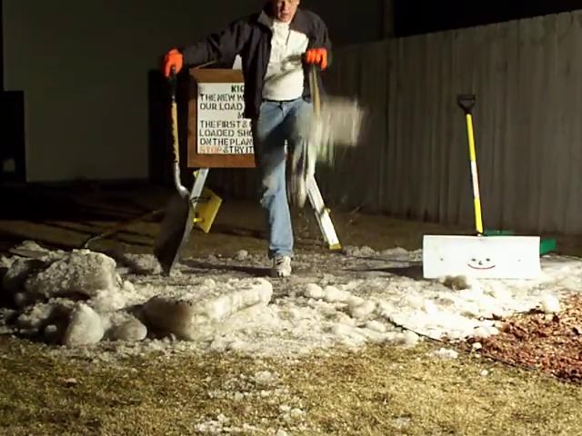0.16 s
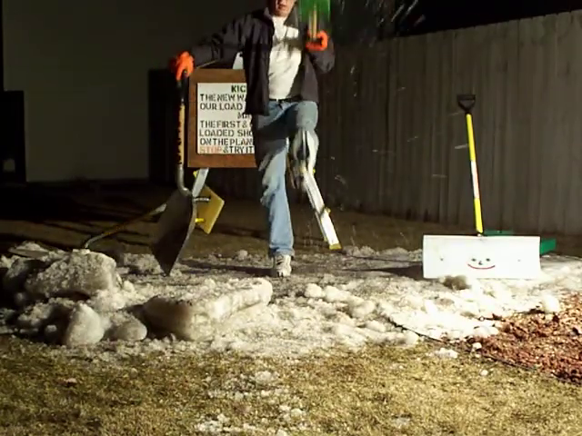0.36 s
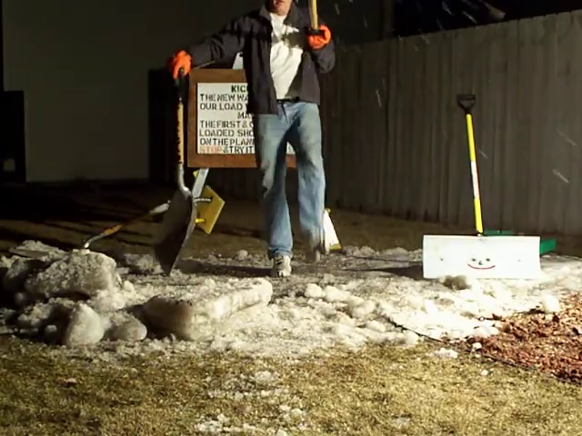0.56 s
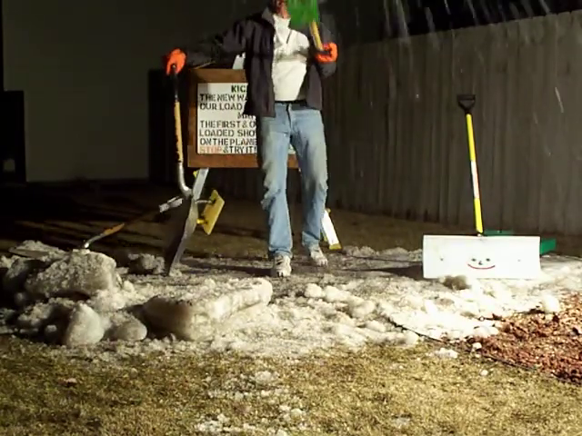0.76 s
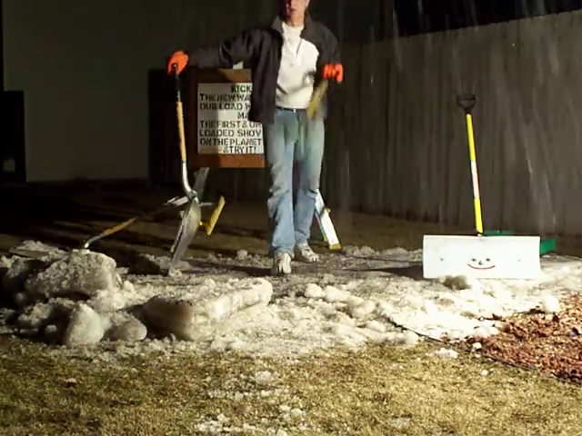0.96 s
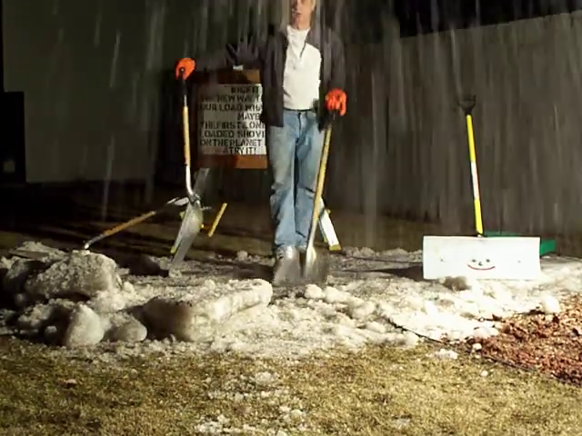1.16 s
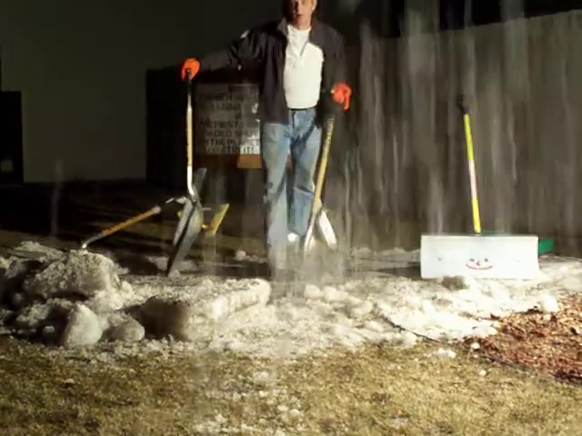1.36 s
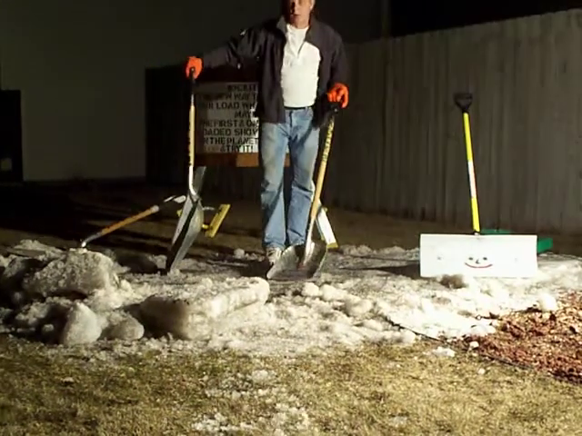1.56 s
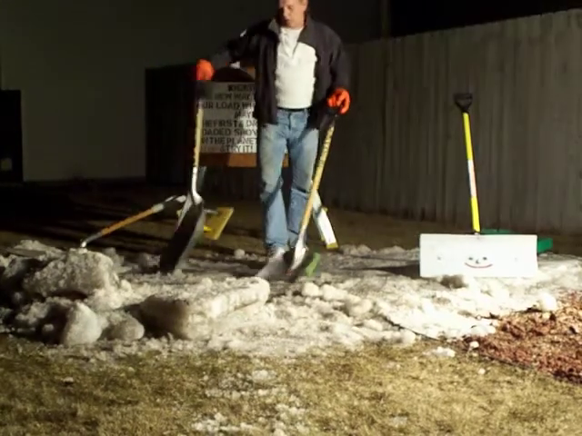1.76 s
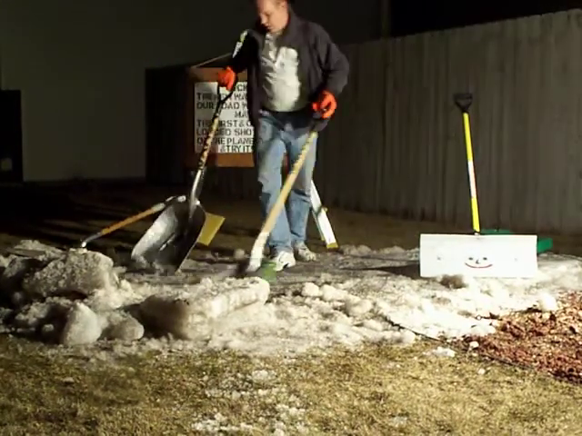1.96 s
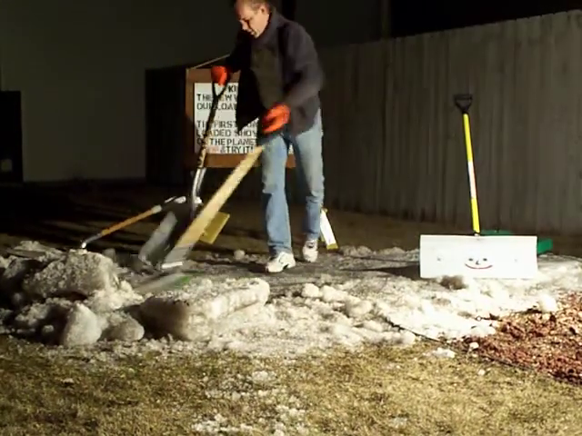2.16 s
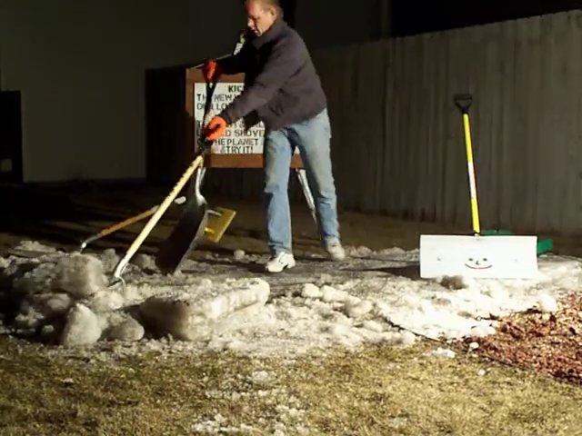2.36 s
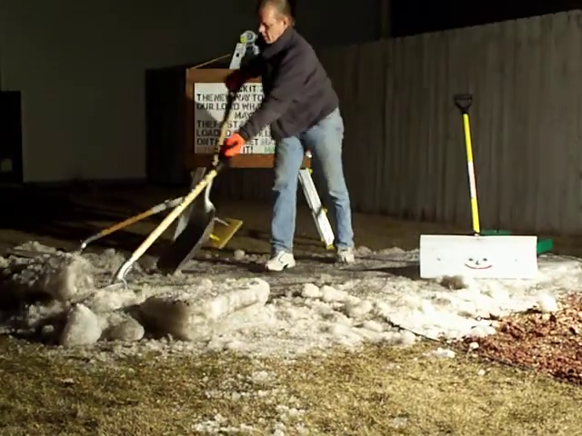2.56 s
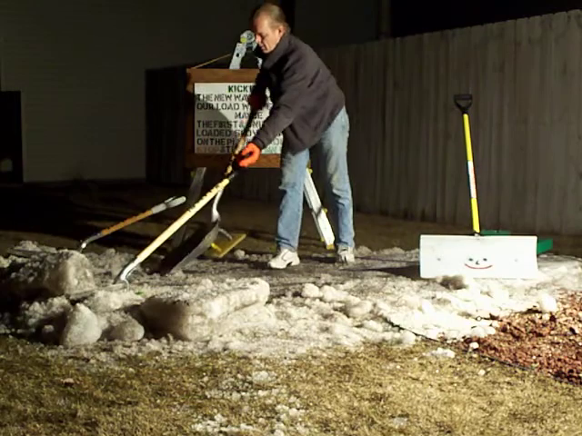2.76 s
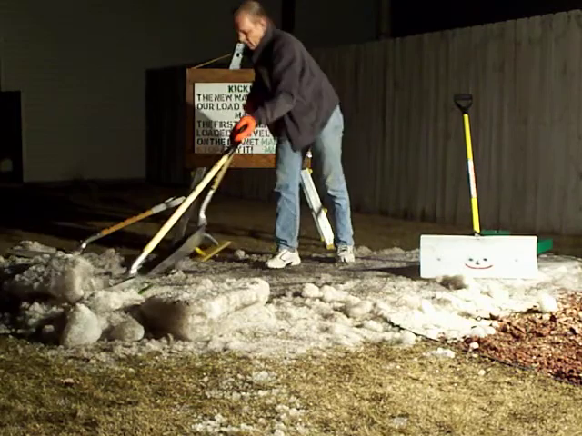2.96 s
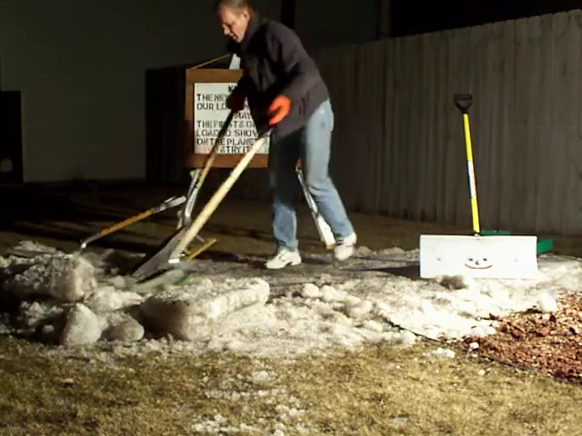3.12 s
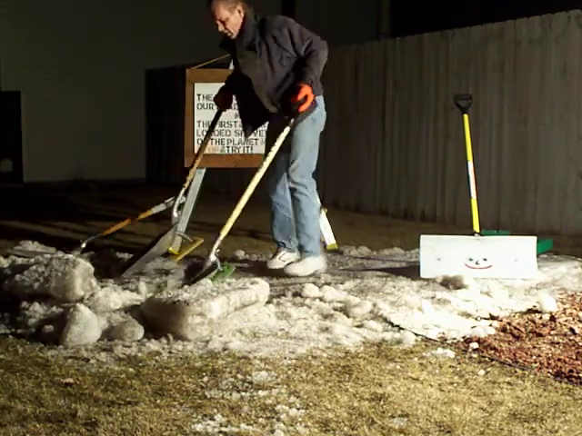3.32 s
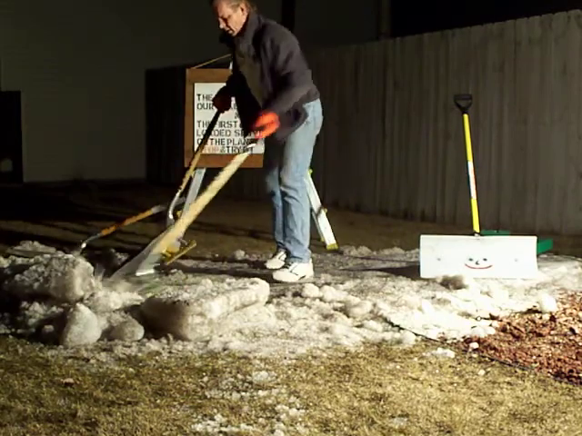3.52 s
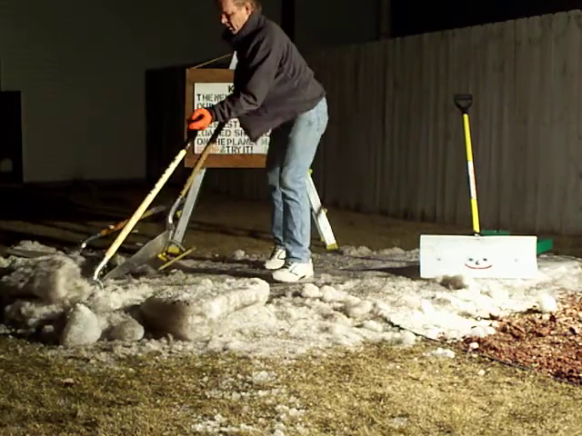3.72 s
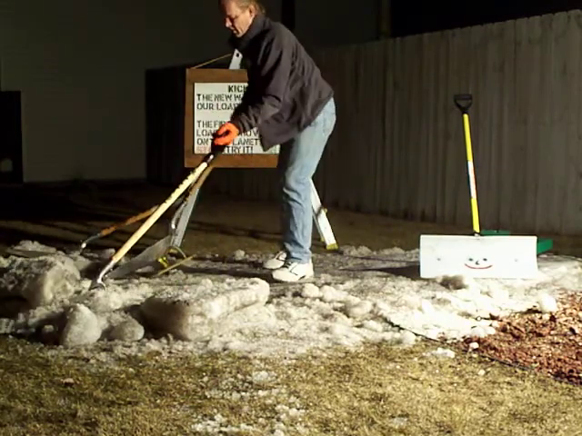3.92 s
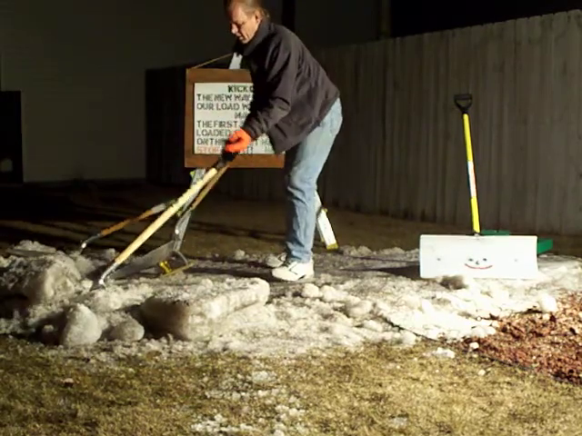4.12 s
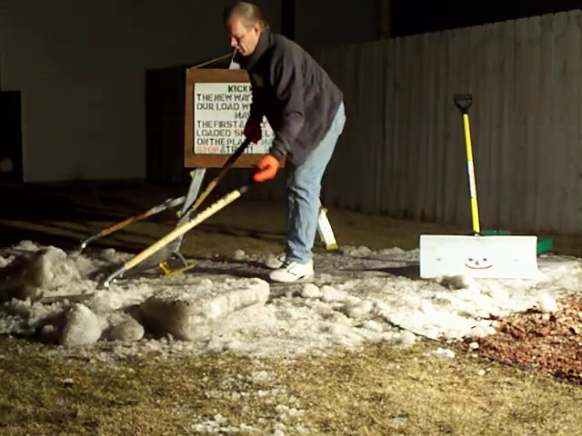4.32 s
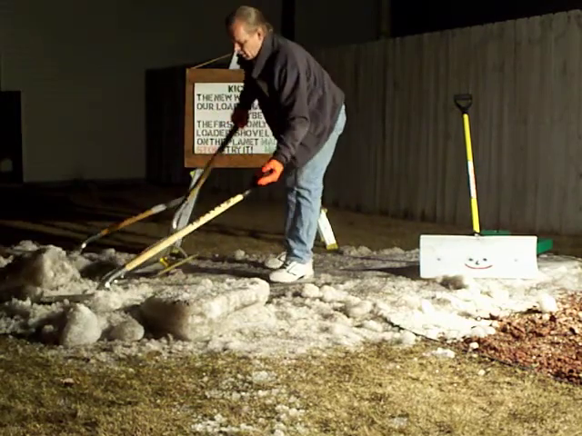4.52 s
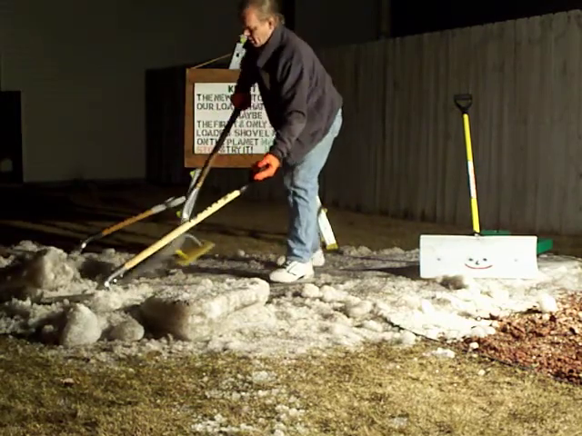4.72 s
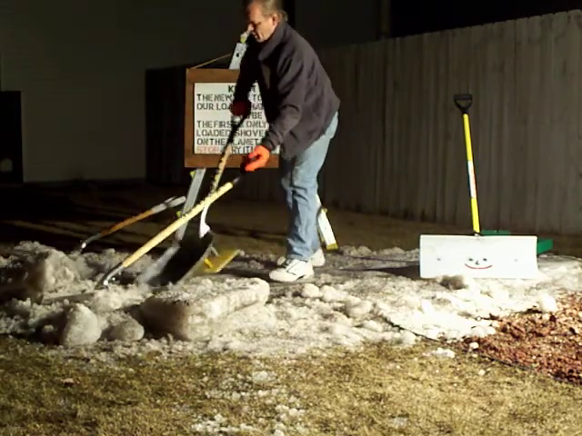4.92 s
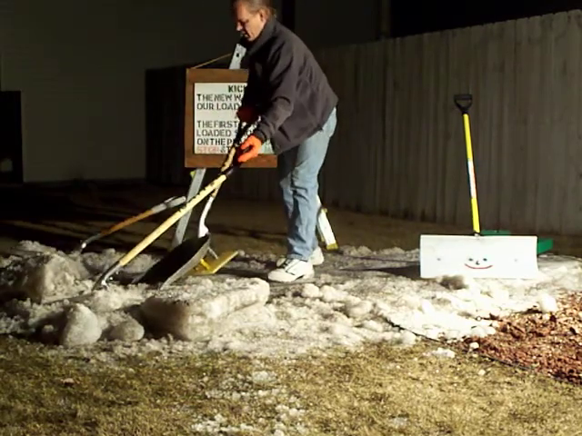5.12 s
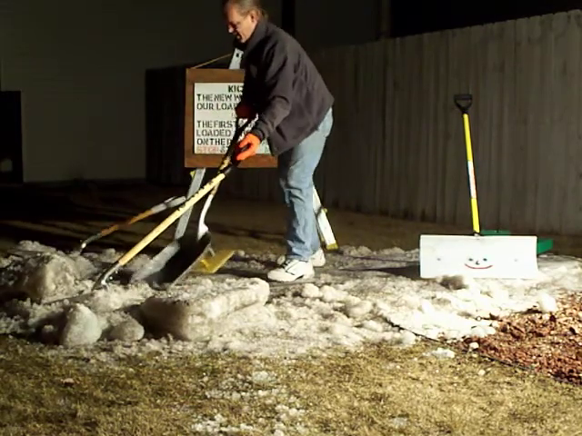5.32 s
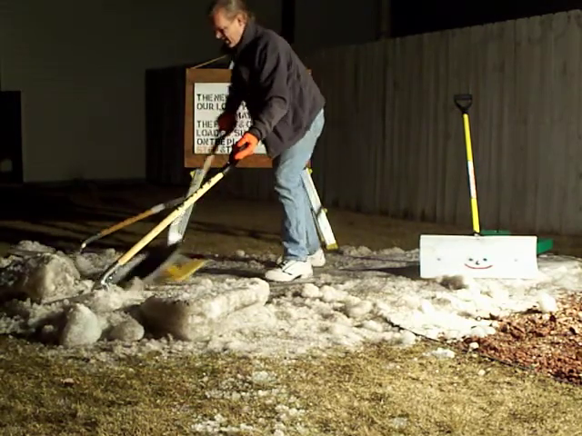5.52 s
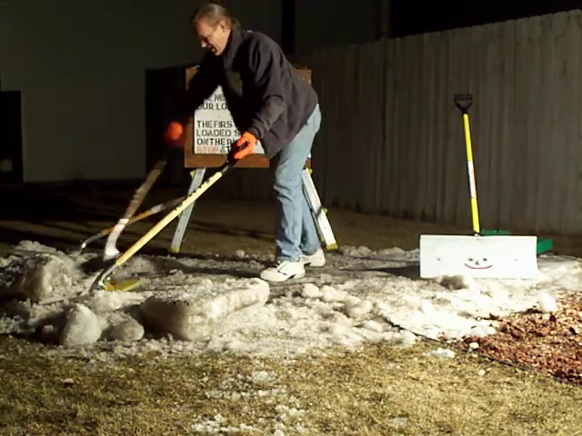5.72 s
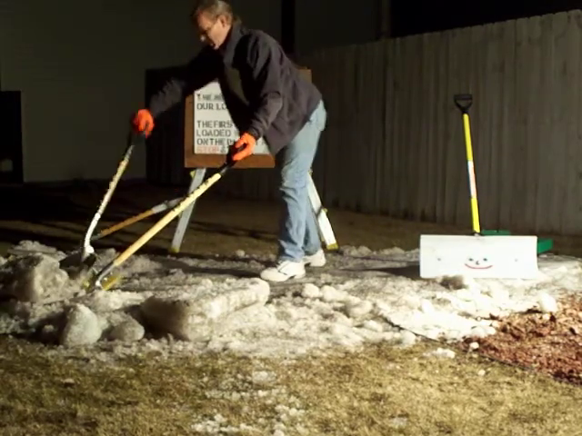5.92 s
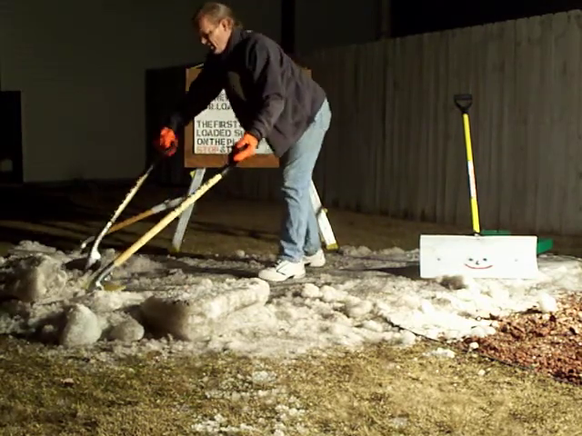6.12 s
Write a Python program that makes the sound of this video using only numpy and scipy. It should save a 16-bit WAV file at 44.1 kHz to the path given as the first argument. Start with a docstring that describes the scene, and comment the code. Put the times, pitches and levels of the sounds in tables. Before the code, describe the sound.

A quiet fenced yard at night, with a soft distant town hum and a faint, wavering, very high whine in thin hiss. At 0.05 to 0.25 s a shovel blade tears out of icy snow in six rapid crackling slips. A near-quiet gap follows until about 0.8 s, when the flung load begins pattering down; a heavy hollow thud lands at 1.13 s and a loud, bright crack at 1.28 s, crumbling away by 1.5 s. From 1.6 s short uneven shoves crunch and hiss through crust, with icy snaps near 2.15 and 2.4 s. Scraping strengthens from 2.8 s to a gritty, clinking bump around 3.45-3.55 s. It is sparse and faint until a crunch at 4.75 s, then harsh icy scraping grows from 5.2 to 5.7 s, with a very sharp click at 5.65 s, ending in weak dull scrapes. Short dry wall reflections, dulled narrow-band microphone.

```python
"""Shovel blades work packed, icy snow in a fenced yard at night, taken with a narrow-band recorder.
One blade judders free in six slips and its load patters and thuds down; then uneven shoves crunch
through the crust. Random grains feed blade modes and body, crunch and hiss filters; cracks and thuds
are decaying fracture bursts, crumbs and clinks decaying sines. Fence and walls add a short tail.
Behind lie a far town hum of filtered noise and a faint, wavering high whine in a thin hiss."""
import sys
import numpy as np
from scipy import signal
from scipy.fft import rfft, irfft
from scipy.io import wavfile
from scipy.ndimage import map_coordinates

SR = 44100
rng = np.random.default_rng(int(sys.argv[2]) if len(sys.argv) > 2 else 0)


def generate_wav(signal):
    """Clip the signal to [-1, 1] and save it as 16-bit WAV at the path in sys.argv[1]."""
    frames = np.transpose(np.atleast_2d(signal))
    scaled = np.clip(frames, -1, 1) * 32767
    pcm = np.round(scaled).astype(np.int16)
    wavfile.write(sys.argv[1], SR, pcm)


N = 272520
TIME = np.arange(N) / SR  # t/s

# Far town hum, relative spectrum: (f/Hz, density/dB per Hz)
TOWN_SPECTRUM = [(20, -24.5), (60, -0.5), (110, 3), (500, 3.5), (1100, 1), (1600, -6), (3300, -21),
                 (8000, -20)]
# Background level, sinking after the loud hit and recovering, before its random wander: (t/s, level/dB)
BACKGROUND_LEVEL = [(0, -54), (1.1, -52.5), (1.55, -58), (2.15, -63), (2.45, -54), (6.18, -52.5)]
# Thin high tones, centre of their waver: (f/Hz, level/dB)
WHINE_TONES = [(7830, -70.5), (8170, -69.5)]
FIZZ_DB, FIZZ_HZ, FIZZ_WIDTH_HZ = -67.5, 7800, 400  # thin hiss around the tones

# Decay of the fence and wall tail: (f/Hz, t60/s)
YARD_DECAY = [(150, 0.04), (600, 0.22), (2000, 0.084), (8000, 0.15)]

# Clods landing and blades bumping: (t/s, peak level/dB, decay/s)
THUDS = [(0.0208, -30.5, 0.0013), (1.1295, -14.5, 0.0057), (1.1339, -19, 0.0016), (1.158, -29, 0.0043),
         (1.286, -29, 0.003), (1.503, -47, 0.0024), (2.878, -39, 0.0026), (3.531, -34, 0.0034),
         (3.541, -24.5, 0.005), (3.864, -34, 0.0013), (4.097, -37.5, 0.0051), (4.283, -42, 0.0043),
         (5.745, -36, 0.0021)]
# Crumbling clod, relative spectrum: (f/Hz, density/dB per Hz)
CLOD_SPECTRUM = [(25, -45.5), (170, -22.5), (320, -9), (450, 3), (750, 1.5), (1100, 2), (2300, -13.5),
                 (8000, -37.5)]
# Hollow ring under a thud: (f/Hz, relative level/dB, decay/s)
KNOCK_MODES = [(337, -9.5, 0.022), (414, 10, 0.0046), (550, 5.5, 0.0036), (857, -6.5, 0.004),
               (1048, 2.5, 0.0078), (1443, -1.5, 0.0067), (1880, -11, 0.0036)]
KNOCK_SHARP, KNOCK_SETTLE_S = 0.087, 0.0023  # ring starts sharp by this share, settles as the clod spreads

# Hard lumps and crumbs catching on the blade: (t/s, f/Hz, peak level/dB before the bass cut)
CLINKS = [(0.0202, 923, -25.5), (0.042, 900, -35), (0.199, 1820, -28.5), (0.905, 1384, -32),
          (1.062, 1740, -25.5), (1.115, 1870, -32), (1.24, 1800, -27), (1.285, 2680, -30),
          (1.504, 513, -36), (1.553, 1510, -32), (1.677, 1840, -33.5), (1.787, 1740, -34),
          (2.222, 870, -32), (3.437, 1970, -24), (3.467, 740, -24), (3.496, 2080, -20.5),
          (3.542, 496, -15.5), (3.571, 890, -25.5), (4.511, 5600, -36), (5.075, 1810, -42.5),
          (5.973, 5620, -42)]
CLINK_DECAY_S = 0.0039

# Ice chunks cracking and striking: (t/s, peak level/dB, decay/s, treble tilt/dB per octave)
CRACKS = [(.814, -35, 0.022, 8), (0.9033, -30.5, 0.0067, 1), (.9275, -37, 0.0022, 4),
          (0.939, -29, 0.0015, 7), (0.9503, -32, 0.0036, 1), (1.0616, -28.5, 0.0026, -1.5),
          (1.1317, -20, 0.0019, 2.5), (1.135, -22, 0.0024, -1.5), (1.138, -31.5, 0.012, 3),
          (1.2395, -32.5, 0.0037, -1), (1.2844, -8.5, 0.0017, 5.5), (1.289, -25, 0.0053, -2.5),
          (1.304, -29.5, 0.0049, -1.5), (1.324, -35, 0.013, -2), (1.364, -36, 0.0075, 0.5),
          (1.415, -33.5, 0.0087, -1), (1.5217, -30, 0.00053, 4), (1.549, -39, 0.021, -2.5),
          (1.827, -30, 0.003, 5), (2.148, -29, 0.0092, 9.5), (2.383, -32.5, 0.021, 9),
          (2.89, -28, 0.0048, -6.5), (3.17, -26, 0.011, 6.5), (3.437, -22.5, 0.0082, 0.5),
          (3.528, -25, 0.0044, -2), (3.546, -26.5, 0.0063, -3), (4.095, -40, 0.0061, -2.5),
          (4.172, -39.5, 0.0046, -2.5), (4.283, -44.5, 0.0068, 0), (4.749, -38, 0.0097, 5),
          (4.776, -30, 0.005, 0.5), (4.862, -29, 0.0038, 0), (5.6545, -11, 0.00024, -2),
          (5.657, -25, 0.0045, 0), (5.714, -27, 0.002, -2.5), (6.132, -43.5, 0.0019, 5)]
# Breaking ice, relative spectrum: (f/Hz, density/dB per Hz)
ICE_SPECTRUM = [(30, -39.5), (300, -6.5), (700, 2), (1600, 2), (3000, 2.5), (4500, 0), (6200, 4),
                (8500, -9.5)]
RISE_SHARE = 0.24  # time constant of a fracture's build-up, as a share of its decay

# Peak level of each slip as the blade tears free: (level/dB)
JUDDER_LEVELS = [-34, -31, -28.5, -29, -31.5, -34.5]
JUDDER_START_S, JUDDER_BEAT_S = .0503, .0358

# Modes of the blade, ringing under grains and cracks: (f/Hz, width/Hz, relative level/dB)
BLADE_MODES = [(552, 120, -8), (1040, 40, -5.5), (1448, 79, 1), (1950, 410, 1), (2720, 380, -5.5),
               (7805, 1380, 6)]
# Three voices of crushed snow, relative spectra: (f/Hz, density/dB per Hz)
BODY_SPECTRUM = [(30, -49.5), (150, -34), (250, -6), (340, 0), (560, 1.5), (950, -1.5), (1500, -3.5),
                 (3000, -27.5)]
CRUNCH_SPECTRUM = [(400, -33), (900, -8.5), (1500, -5), (2400, 1.5), (3300, -2), (4500, -5.5), (7000, -29)]
HISS_SPECTRUM = [(2000, -24.5), (3600, -1), (5000, 2), (6200, 4), (7300, 1), (8500, -7.5)]
# The flung load raining down: (t/s, level/dB, iciness/dB)
SHOWER = [(.86, -57, 0), (.98, -54, -3), (1.029, -44.5, 5), (1.2, -44, -5.5), (1.32, -46.5, -7.5),
          (1.42, -41.5, -4.5), (1.48, -58.5, 8), (1.55, -73, 5)]
# Shoves of a blade through the crust: (start t/s, push/s, level/dB, iciness/dB)
SHOVES = [(-.02, 0.019, -35, -2.5), (.03, 0.18, -47, 3), (1.574, 0.13, -43.5, -0.5),
          (1.758, 0.028, -43.5, -3.5), (1.811, 0.05, -43, -2), (1.88, 0.2, -42.5, 1),
          (2.08, 0.086, -37.5, -2.5), (2.25, 0.096, -50.5, -7), (2.365, 0.054, -42.5, -4),
          (2.531, 0.13, -46, 0), (2.66, 0.1, -46, 1.5), (2.828, 0.1, -38.5, -5), (2.94, 0.17, -40.5, -2),
          (3.158, 0.035, -32.5, -6), (3.29, 0.093, -35, -1), (3.423, 0.1, -27.5, -5.5),
          (3.662, 0.15, -54, 0), (3.95, 0.0084, -54.5, 0.5), (4.111, 0.068, -48.5, -10.5),
          (4.25, 0.076, -55.5, -7), (4.439, 0.092, -50, -1.5), (4.52, 0.069, -44, -1.5),
          (4.62, 0.05, -47.5, -9), (4.762, 0.053, -34.5, -0.5), (4.84, 0.066, -45, -4.5),
          (5.092, 0.082, -45, -5), (5.21, 0.037, -37.5, -5), (5.3, 0.12, -39.5, -2),
          (5.385, 0.15, -30.5, 2), (5.49, 0.12, -29, -1.5), (5.62, 0.063, -32, -6),
          (5.692, 0.05, -34.5, -10), (5.92, 0.093, -44.5, -12), (5.98, 0.15, -50.5, -26)]
CATCH_SHARE, SWELL_DB = 0.13, 11.5  # share of the push in which the blade bites; build-up to its end
RELEASE_DB_PER_S = 156.5  # fall of the crunch as the blade stops
TRICKLE_DB, TRICKLE_DB_PER_S = -7.5, 78.5  # loosened snow keeps sliding

NOTCH_HZ, EDGE_HZ = 4200, 9000  # recorder: treble notch and upper band edge


def gain_of(db):
    """Decibels to amplitude."""
    return 10 ** (np.asarray(db) / 20)


def evened(x):
    """Scales to rms 1."""
    return x / np.sqrt(np.mean(x ** 2) + 1e-20)


def read(points, hz):
    """Reads a frequency table on a log-frequency axis."""
    f, value = np.transpose(points)
    return np.interp(np.log(hz + 1), np.log(f + 1), value)


def add(mix, s, sound):
    """Lays a sound into the mix at time s."""
    part = mix[max(round(s * SR), 0):][:len(sound)]
    part += sound[:len(part)]


def colour(x, points, tilt_db=0, size=2048):
    """Causal minimum-phase filter with the given spectrum, tilted by dB per octave about 1 kHz."""
    hz = abs(np.fft.fftfreq(size, 1 / SR))
    octaves = np.log2(np.maximum(hz, 300) / 1000)
    log_gain = np.log(gain_of(read(points, hz) + tilt_db * octaves))
    kernel = np.fft.ifft(np.exp(np.conj(signal.hilbert(log_gain)))).real
    return signal.oaconvolve(x, kernel)[:len(x)]


def wander(hz):
    """Slow chance of rms 1, rolling off around the given rate."""
    f = np.fft.rfftfreq(N, 1 / SR)
    return evened(irfft(rfft(rng.standard_normal(N)) / (1 + (f / hz) ** 2), N))


def lean(x, lowest_hz=290):
    """Small things radiate no deep bass: a gentle high-pass."""
    return signal.lfilter(*signal.butter(2, lowest_hz, "high", fs=SR), x)


def night():
    """Far town hum from noise, and two wavering high tones in a thin band of hiss."""
    level_db = np.interp(TIME, *np.transpose(BACKGROUND_LEVEL)) + wander(hz=6.8)
    hum = evened(colour(rng.standard_normal(N), TOWN_SPECTRUM)) * gain_of(level_db)
    whine = np.zeros(N)
    for centre_hz, db in WHINE_TONES:
        wavering_hz = centre_hz + 12 * wander(hz=39.7)
        tone = np.sin(2 * np.pi * np.cumsum(wavering_hz) / SR)
        whine += gain_of(db) * evened(tone)
    fizz_band = signal.iirpeak(FIZZ_HZ, FIZZ_HZ / FIZZ_WIDTH_HZ, SR)
    fizz = evened(signal.lfilter(*fizz_band, rng.standard_normal(N)))
    return hum + whine + gain_of(FIZZ_DB) * fizz


def yard(x, wet_db=-12, first_s=0.0092):
    """Fence and walls scatter a short, thin tail: sparse random echoes, each band dying at its own rate."""
    echoes = rng.standard_normal(SR) * (rng.random(SR) < 3000 / SR)
    echoes = echoes * (np.arange(SR) > first_s * SR)
    hz, t, bands = signal.stft(echoes, SR, nperseg=256)
    fading = bands * gain_of(-60 * t / read(YARD_DECAY, hz)[:, None])
    tail = signal.istft(fading, SR, nperseg=256)[1]
    return x + gain_of(wet_db) * signal.fftconvolve(x, tail / np.linalg.norm(tail))[:N]


def burst(decay, grit_db=3, size=4096):
    """A quick, uneven run of fractures that dies away, and its envelope's rms at unit peak."""
    t, decay = np.arange(size) / SR, max(decay, .0003)
    envelope = (1 - np.exp(-t / (RISE_SHARE * decay))) * np.exp(-t / decay)
    sizes = gain_of(grit_db * rng.standard_normal(size))
    fractures = envelope * sizes * rng.choice([-1, 1], size)
    return fractures, np.sqrt(np.mean(envelope ** 2)) / envelope.max()


def thuds(ring_db=-2, crumble_db=-5):
    """Heavy clods collapse with a dull crunch and a hollow knock of damped, downward-settling modes."""
    t, out = np.arange(4096) / SR, np.zeros(N)
    settling = t + KNOCK_SHARP * KNOCK_SETTLE_S * (1 - np.exp(-t / KNOCK_SETTLE_S))
    knock = np.zeros(len(t))
    for hz, db, decay in KNOCK_MODES:
        knock += gain_of(db) * np.sin(2 * np.pi * hz * settling) * np.exp(-t / decay)
    knock = evened(lean(knock))
    for s, db, decay in THUDS:
        fractures, rms = burst(decay)
        crumble = evened(colour(fractures, CLOD_SPECTRUM))
        thud = gain_of(crumble_db) * crumble + gain_of(ring_db) * knock
        add(out, s, gain_of(db) * rms * thud)
    return out


def clinks():
    """Single lumps and crumbs ring like small tiles, each a decaying sine."""
    t, out = np.arange(4096) / SR, np.zeros(N)
    for s, hz, db in CLINKS:
        add(out, s, gain_of(db) * np.sin(2 * np.pi * hz * t) * np.exp(-t / CLINK_DECAY_S))
    return lean(out)


def blade(x):
    """The direct sound plus the damped modes of the blade."""
    ringing = x
    for hz, width_hz, db in BLADE_MODES:
        mode = signal.iirpeak(hz, hz / width_hz, SR)
        ringing = ringing + gain_of(db) * signal.lfilter(*mode, x)
    return ringing


def crack(db, decay, tilt_db):
    """One run of fractures heard through the blade."""
    fractures, rms = burst(decay)
    return gain_of(db) * rms * evened(colour(blade(fractures), ICE_SPECTRUM, tilt_db))


def cracks():
    """Hard chunks split or hit the blade, each a burst of fractures."""
    out = np.zeros(N)
    for s, db, decay, tilt_db in CRACKS:
        add(out, s, crack(db, decay, tilt_db))
    return out


def judder(decay=0.0071, tilt_db=3.5):
    """The blade sticks and slips in even beats as it tears free, each slip a crackle of ice."""
    out = np.zeros(N)
    for beat, db in enumerate(JUDDER_LEVELS):
        add(out, JUDDER_START_S + beat * JUDDER_BEAT_S, crack(db, decay, tilt_db))
    return out


def grains(per_s, spread_db):
    """Ice grains snap at random, with exponentially spread sizes and either polarity; rms 1."""
    size = gain_of(spread_db * np.minimum(rng.exponential(1, N), 4.5))
    return evened(size * rng.choice([-1, 1], N) * (rng.random(N) < per_s / SR))


def crumbs(per_s, low_hz, high_hz, cycles, count=30):
    """Loose crumbs tick on the blade: damped sines of random pitch and strength; rms 1."""
    t, out = np.arange(2048) / SR, np.zeros(N)
    pitches = np.geomspace(low_hz, high_hz, count)
    chance, which, size = rng.random(N), rng.integers(0, count, N), rng.uniform(.3, 1, N)
    for at in np.flatnonzero(chance < per_s / SR):
        turns = pitches[which[at]] * t
        add(out, at / SR, size[at] * np.sin(2 * np.pi * turns) * np.exp(-turns / cycles))
    return evened(out)


def loaded(x, drift=.035, drift_hz=7):
    """The blade's ring slides up and down with load and angle: a wandering playback rate."""
    read_at = np.arange(N) + np.cumsum(drift * wander(hz=drift_hz))
    return map_coordinates(blade(x), [read_at], order=3, mode="mirror")


def catches(per_s, decay):
    """The edge snags on hard ice at uneven moments: force jumps, then eases off. Mean 0, rms 1."""
    jumps = signal.lfilter([1], [1, -np.exp(-1 / (decay * SR))], rng.random(N) < per_s / SR)
    return evened(np.sqrt(jumps) - np.sqrt(jumps).mean())


def shove(start, push):
    """Envelope of a shove: the blade bites, snow piles up, it stops, and loose snow trickles on."""
    done = np.clip((TIME - start) / push, 0, 1)
    swell = np.minimum(done / CATCH_SHARE, 1) * gain_of(-SWELL_DB * (1 - done) ** 2)
    after = np.maximum(TIME - start - push, 0)
    trickle_db = TRICKLE_DB - TRICKLE_DB_PER_S * after
    return swell * gain_of(np.maximum(-RELEASE_DB_PER_S * after, trickle_db))


def crushing():
    """Level and iciness of all moving snow: powers add, and iciness is their power-weighted mean."""
    s, level, icy = np.transpose(SHOWER)
    raining = (TIME > s[0]) * (TIME < s[-1])
    power = gain_of(np.interp(TIME, s, level)) ** 2 * raining + 1e-14
    icy_sum = power * np.interp(TIME, s, icy)
    for start, push, db, icy_db in SHOVES:
        part = (gain_of(db) * shove(start, push)) ** 2
        power, icy_sum = power + part, icy_sum + part * icy_db
    return 10 * np.log10(power), icy_sum / power


def scrape():
    """Grains break under the blade: icy snow hisses, soft snow rumbles; stray chips fade less steeply."""
    level_db, icy_db = crushing()
    force = gain_of(level_db + 1.47 * catches(per_s=140, decay=0.0027))
    snaps = grains(per_s=1800, spread_db=0.5)  # shared by the three voices

    body_grains = snaps + 0.92 * grains(per_s=1500, spread_db=2.0)
    body = evened(colour(loaded(body_grains), BODY_SPECTRUM)) * gain_of(-5 - 0.19 * icy_db)

    crunch_grains = snaps + 0.79 * grains(per_s=7000, spread_db=-1)
    crunch = evened(colour(loaded(crunch_grains), CRUNCH_SPECTRUM)) * gain_of(-5.0 + 0.49 * icy_db)

    hiss_grains = .5 * snaps + grains(per_s=11000, spread_db=2.5)
    hiss = evened(colour(blade(hiss_grains), HISS_SPECTRUM))
    hiss = hiss * gain_of(1.06 + icy_db + wander(hz=250))

    lumps = lean(lean(crumbs(per_s=90, low_hz=448.6, high_hz=1400, cycles=4.1))) * gain_of(-12.5)
    ticks = crumbs(per_s=98, low_hz=1413, high_hz=3203, cycles=20) * gain_of(-8.0 + 0.57 * icy_db)
    splinters = crumbs(per_s=85, low_hz=4945, high_hz=7880, cycles=20) * gain_of(-8.5 + icy_db)

    chips = evened(colour(blade(grains(per_s=100, spread_db=2.0)), ICE_SPECTRUM))
    chips = chips * gain_of(-28.5 + 0.67 * level_db)
    return force * (body + lumps + crunch + ticks + hiss + splinters) + chips


def scene():
    """Shovels and falling snow within the yard's tail, over the night beyond it."""
    work = scrape() + judder() + cracks() + clinks() + thuds()
    return (yard(work) + night())[None]


def record(dry, notch_width_hz=2100, rolloff_hz=7900, hiss_db=-80):
    """A narrow-band recorder with a deep notch in the treble and a faint hiss of its own."""
    notched = signal.lfilter(*signal.iirnotch(NOTCH_HZ, NOTCH_HZ / notch_width_hz, SR), dry)
    noisy = notched + gain_of(hiss_db) * rng.standard_normal(N)
    dulled = signal.sosfilt(signal.butter(12, rolloff_hz, fs=SR, output="sos"), noisy)
    edge = signal.firwin(301, EDGE_HZ, window=("kaiser", 8), fs=SR)
    return signal.oaconvolve(dulled, edge[None], "same")


dry = scene()
out = record(dry)
generate_wav(out)
```